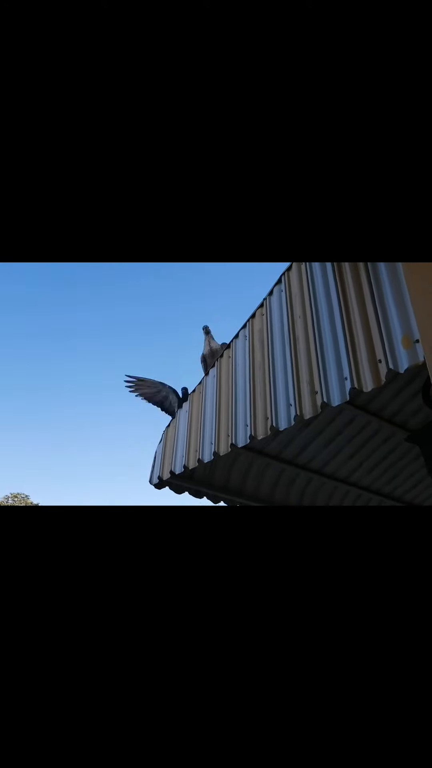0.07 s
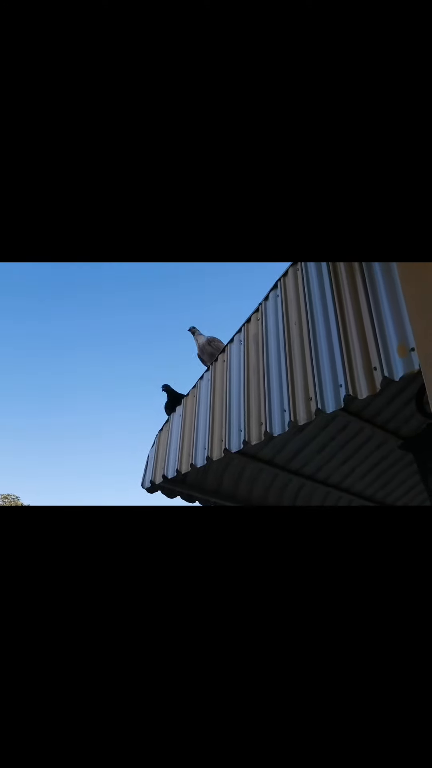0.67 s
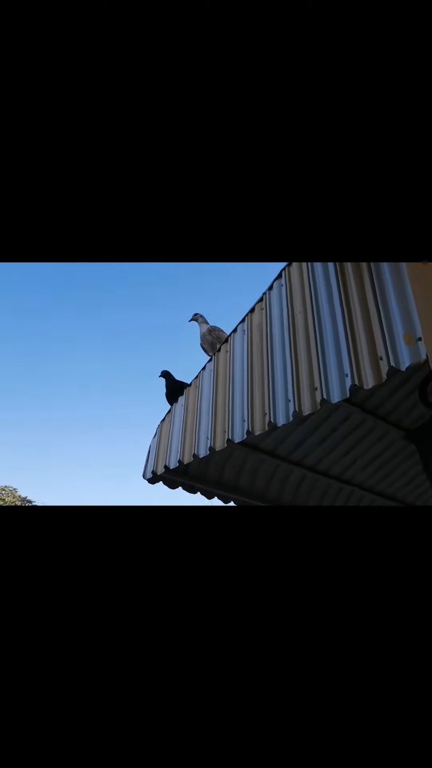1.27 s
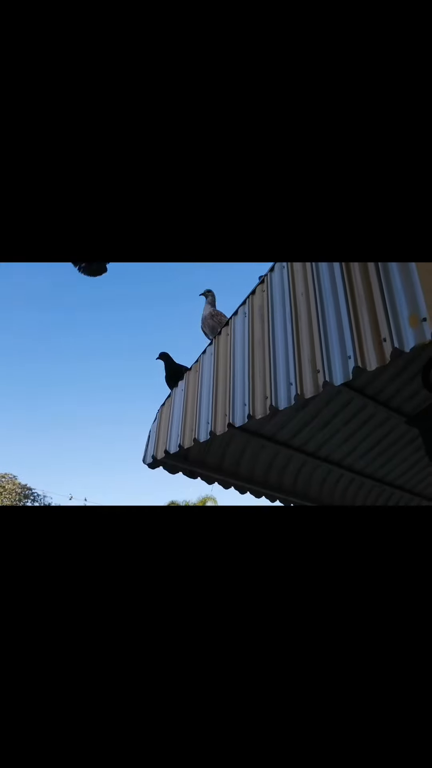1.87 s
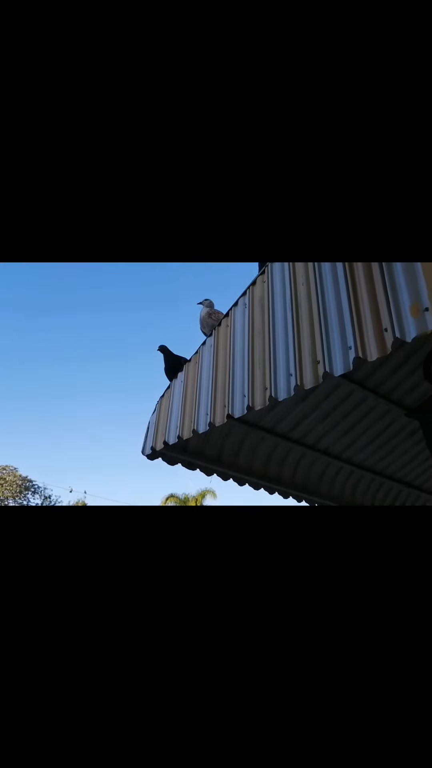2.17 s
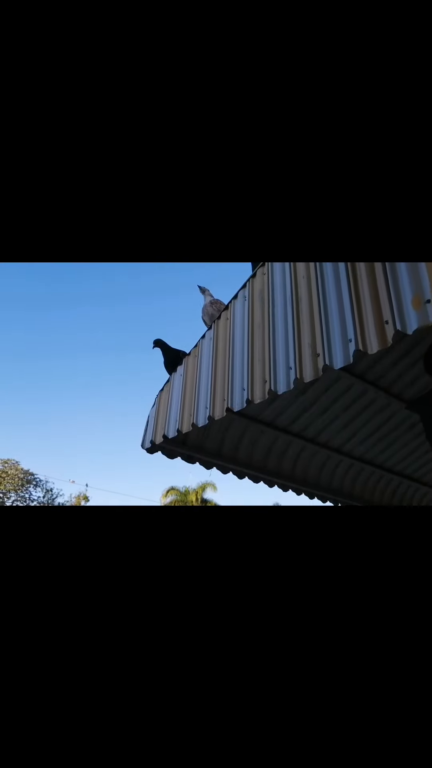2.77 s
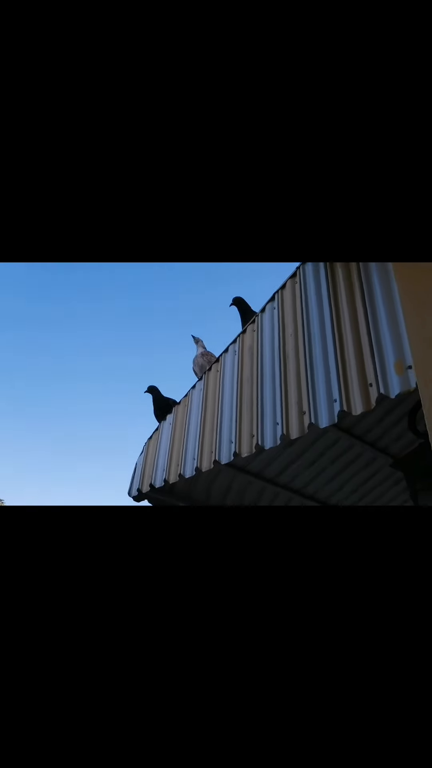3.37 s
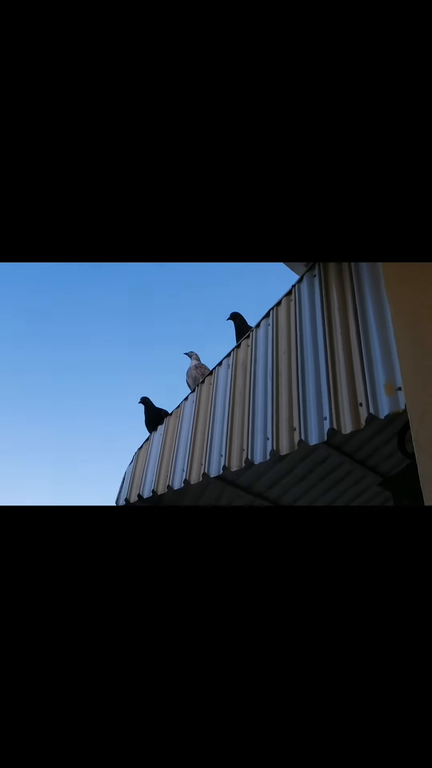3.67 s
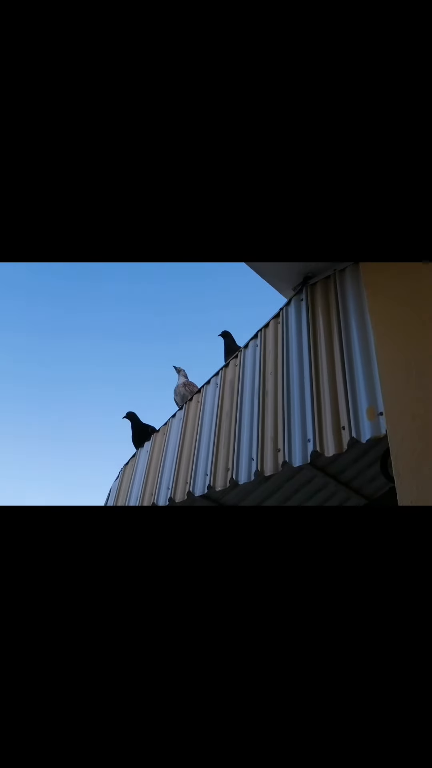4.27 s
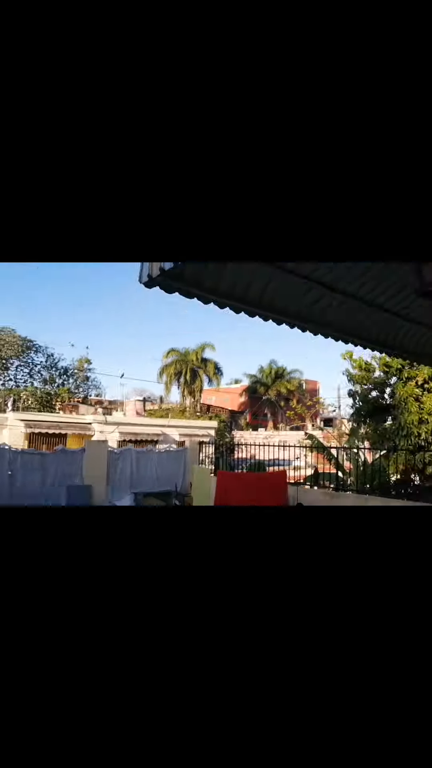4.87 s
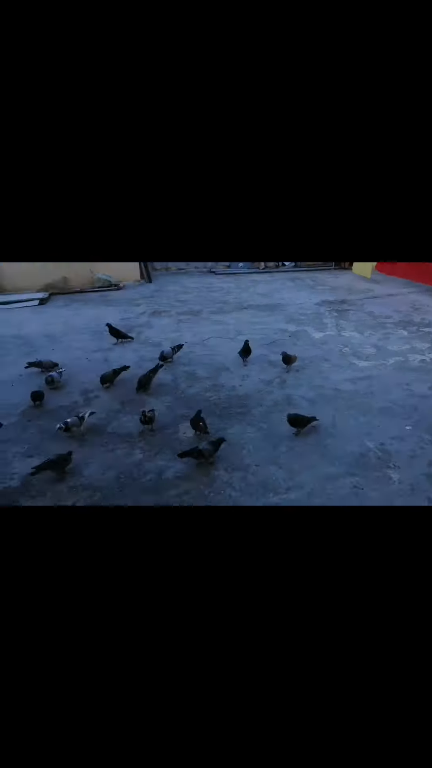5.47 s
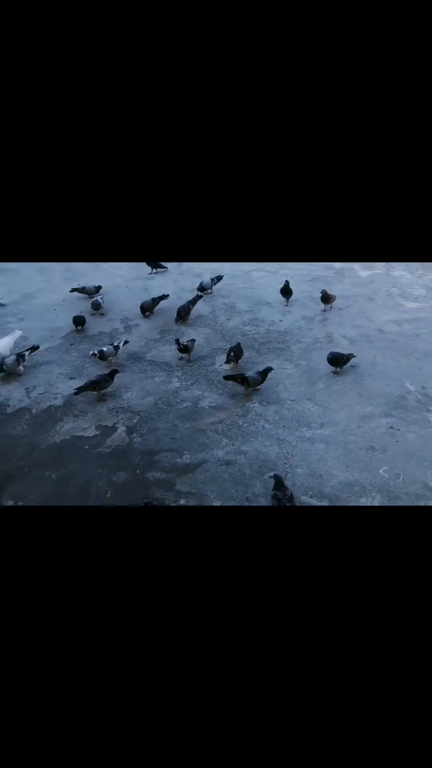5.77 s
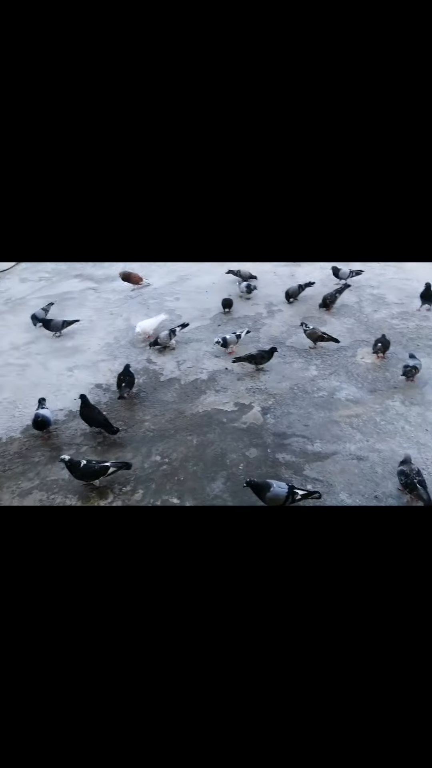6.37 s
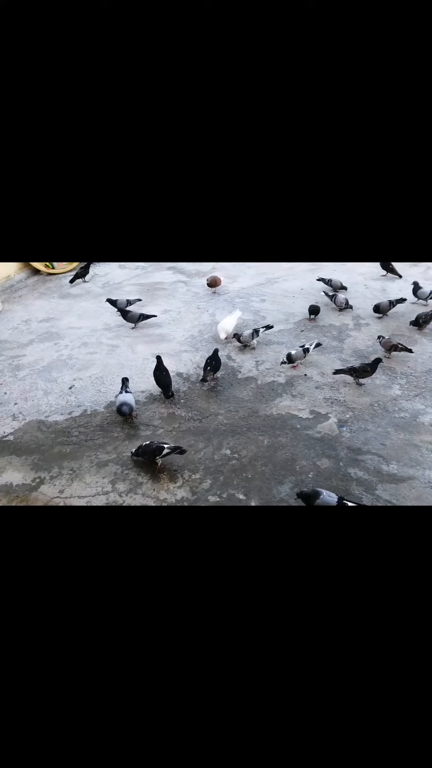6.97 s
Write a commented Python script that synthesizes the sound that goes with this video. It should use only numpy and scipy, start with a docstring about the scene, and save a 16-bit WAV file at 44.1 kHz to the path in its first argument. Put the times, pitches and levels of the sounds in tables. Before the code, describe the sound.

Pigeons land on a tin awning with wing claps and claw scuffs, then coo while a small bird sings faintly further off.

```python
"""Pigeons coo on a tin awning above a walled patio, after landing with wing claps, rustles and claw scuffs.
Each coo is a nearly pure throat tone, hoarse when soft or low, among short throaty pulses; walls echo it.
Wings and claws are bursts of crackling noise that ring the tin, with soft rustles and breathy puffs between.
Further off, a small bird repeats a three-note song, with a harsh chirp and faint calls.
Three dry ticks sound close by. Underneath, a quiet outdoor hum, and air buffeting the microphone."""
import sys
import numpy as np
from scipy import signal
from scipy.fft import rfft, irfft, next_fast_len
from scipy.io import wavfile
from scipy.ndimage import uniform_filter1d

SR = 44100
rng = np.random.default_rng(int(sys.argv[2]) if len(sys.argv) > 2 else 0)


def generate_wav(sig):
    """Save sig (samples, or channels by samples) to the path in sys.argv[1] as 16-bit PCM at SR."""
    pcm = np.round(np.clip(np.atleast_2d(sig).T, -1, 1) * 32767).astype(np.int16)
    wavfile.write(sys.argv[1], SR, pcm)


N = 310023
TIME = np.arange(N) / SR

# Distant hum. Each row: frequency in Hz, relative level in dB.
HUM_SPECTRUM = [(71, -35), (120, -5.5), (169, -2.5), (211, -4), (259, 1), (380, -1.5), (739, -13),
                (1300, -16.5), (2290, -15.5), (2800, -23.5), (9050, -33.5), (10600, -46.5), (13800, -46),
                (15000, -64)]
# Air on the microphone. Each row: frequency in Hz, relative level in dB.
BUFFET_SPECTRUM = [(12, -38), (20, -0.5), (65, 3), (86, 3), (108, -5.5), (135, -3), (220, -8), (290, -39),
                   (480, -120)]
# Breeze with one lull. Each row: time in seconds, level in dB.
BREEZE_LEVEL = [(0, -55), (1.2, -53), (1.75, -59), (2.2, -52), (3, -55.5), (7, -56.5)]
# Gusts on the microphone. Each row: centre in seconds, half width in seconds, level in dB.
WIND_GUSTS = [(.58, 0.043, -42), (.87, 0.27, -46.5), (1.56, 0.04, -56.5), (2.12, 0.059, -46.5)]
# Ticks. Each row: time in seconds, peak in dB, centre frequency in Hz, left minus right in dB.
DRY_TICKS = [(1.796, -28, 4770, -22), (2.022, -36.5, 1090, -11), (5.004, -32, 970, -33)]
# Small bird's song. Each row: delay and length in seconds, start and end pitch in Hz,
# relative level in dB, rasp from 0 to 1.
SONG_NOTES = [(0, 0.063, 5534, 5460, -1.5, 0.13), (0.08, .066, 5184, 5050, -4, 0.46),
              (.16, .045, 5220, 5040, -8.5, .45)]
# Repeats of the song. Each row: start in seconds, level in dB, left minus right in dB.
SONG_REPEATS = [(1.08, -42.5, -6), (2.086, -44.5, -18), (3.57, -51.5, 9), (5.615, -56.5, 21)]
# Faint falling calls. Each row: start and length in seconds, start pitch in Hz, level in dB.
FALLING_CALLS = [(5.7, .11, 4700, -64), (5.94, 0.067, 4340, -68), (6.07, 0.068, 5440, -65),
                 (6.098, 0.19, 4120, -72), (6.79, 0.11, 5100, -68.5), (6.92, 0.052, 4400, -62.5)]
# Partials of a harsh two-part chirp. Each row: start and length in seconds, start and end
# frequency in Hz, level in dB, rasp from 0 to 1.
CHIRP_PARTIALS = [(4.437, 0.053, 2720, 2640, -46.5, .2), (4.438, 0.077, 7560, 6920, -56.5, 0.55),
                  (4.538, 0.062, 3200, 2510, -55.5, .39), (4.543, .07, 3600, 3490, -57, 0.44),
                  (4.535, 0.069, 6740, 6500, -56, 0.44), (4.539, 0.055, 7950, 7660, -54, .3),
                  (4.543, 0.048, 10500, 10400, -67, 1), (4.54, 0.051, 13200, 13200, -76, .6)]
# Side of the movement on the awning. Each row: time in seconds, left minus right in dB.
AWNING_PAN = [(0, -.5), (1.8, -0.5), (2.25, 0.5), (2.65, 7), (3.5, 8), (5.4, 16.5), (7, 12)]
# Resonances of the tin. Each row: frequency in Hz, weight in dB (halved in use).
AWNING_MODES = [(759.0, -46.5), (861.3, -60.5), (1109, -68), (1572, -59), (1755, -79), (2078, -55),
                (2589, -58.5), (3122, -64), (3332, -68.5), (3967, -59)]
# Feathers sliding on tin. Each row: start and length in seconds, level in dB.
FEATHER_SLIDES = [(1.477, .04, -61), (1.591, .03, -56), (3.044, 0.12, -57), (3.202, 0.14, -63),
                  (4.206, .08, -69)]
# Hiss of a slide. Each row: frequency in Hz, relative level in dB.
SLIDE_SPECTRUM = [(3000, -20), (5500, -12.5), (8000, -1.5), (9800, -2), (11000, -15.5), (15000, -19)]
# Soft rustles and breathy puffs. Each row: start and length in seconds, relative level in dB,
# air push weight in dB.
RUSTLES_AND_PUFFS = [(0, .15, -40.3, -2.5), (0.43, 0.16, -46, -8), (0.616, .35, -43, -2.5),
                     (1.04, 0.53, -54.5, 0), (1.77, .22, -59, 1.5), (2.076, .21, -52.5, -3),
                     (2.4, 0.94, -65, 8), (3.546, 0.065, -68.5, 13.5), (3.788, 0.056, -65.5, 12),
                     (4.01, 0.22, -71.5, 8), (4.219, .1, -68, 7), (4.546, .09, -63.5, 5),
                     (4.88, 0.34, -69.5, 4.5), (6.773, 0.21, -74, 9)]
# Claws on tin. Each row: start in seconds, level in dB, t60 in seconds, ring in Hz.
CLAW_SCUFFS = [(.325, -43, 0.077, 3320), (0.472, -44, 0.38, 7800), (1.244, -47.5, .21, 5060),
               (1.619, -55.5, .15, 7500), (3.004, -49, 0.12, 2450), (3.25, -50, 0.053, 2990),
               (3.373, -54.5, 0.14, 2970), (3.502, -54, 0.27, 7200), (3.636, -55, 0.2, 7000),
               (4.21, -62, 0.16, 6560), (5.415, -66, 0.12, 8860), (6.051, -67, .15, 7000)]
# Wing claps. Each row: start in seconds, level in dB, air push weight in dB, t60 in seconds, ring in Hz.
WING_STROKES = [(.058, -36, -5, 0.45, 1100), (.09, -42.5, 6.5, 0.29, 960), (.119, -35.5, -7, 0.17, 3070),
                (0.214, -31.8, -4.5, .24, 1490), (.36, -33.5, -8.5, 0.24, 3540),
                (.409, -40, 1.5, 0.25, 5660), (0.6, -39, -4.5, .16, 1380), (0.704, -42.5, 14.5, .08, 870),
                (.78, -40.5, 11, 0.22, 755), (0.889, -34.5, -3, 0.27, 3700), (.945, -38.5, 1, 0.11, 1880),
                (1.026, -47.5, 10, 0.28, 2670), (1.31, -47.5, 2, 0.15, 795), (1.731, -52.5, -4, 0.53, 2650),
                (2.051, -43, 2, 0.58, 5460), (2.225, -37.5, -22, 0.26, 1850), (2.626, -42.5, 2, .9, 1420),
                (2.645, -44.5, 4, .45, 3000)]
# Bright crackle. Each row: frequency in Hz, relative level in dB.
CRACKLE_SPECTRUM = [(700, -9), (1400, -2), (3200, -2.5), (4400, -4), (6000, -4), (7800, -5), (9900, -11),
                    (11000, -21), (15000, -32)]
# Dull push of air. Each row: frequency in Hz, relative level in dB.
PUSH_SPECTRUM = [(150, -3.5), (300, 4.5), (700, 0), (1100, -7), (1700, -16), (3000, -16.5)]
# Throat pulses. Each row: start in seconds, relative peak in dB, pitch in Hz.
THROAT_PULSES = [(0.708, -29, 387), (.786, -32.5, 297), (1.012, -29.5, 363), (1.035, -32.5, 377),
                 (1.092, -30.5, 322), (1.215, -31.5, 334), (1.418, -25.5, 362), (1.762, -29, 320),
                 (2.134, -33.5, 383), (2.203, -28, 390), (2.562, -26.5, 380), (3.81, -31, 360),
                 (3.888, -24, 390), (3.96, -28.5, 359), (4.578, -34, 310), (4.626, -31, 312),
                 (4.878, -24.5, 307), (6.12, -38, 380), (6.241, -39.5, 302), (6.846, -40, 232),
                 (6.89, -39.5, 238)]
# Low murmurs. Each row: start and length in seconds, start and end pitch in Hz, relative level in dB.
LOW_MURMURS = [(1.879, 0.065, 196.5, 187.7, -48.5), (2.012, 0.058, 232, 239.5, -48),
               (2.63, .1, 195, 235, -46), (3.19, .24, 385, 370, -55), (3.511, .17, 230.2, 232.4, -51),
               (3.691, 0.082, 246, 269.5, -47), (4.04, .07, 450, 410, -53), (5.981, 0.1, 256, 287, -57.5),
               (6.442, 0.206, 251.5, 268, -48.5), (6.666, 0.089, 240.2, 211.6, -51),
               (6.835, 0.083, 214.4, 216.2, -53)]
# Full coos, one list per coo. Each row: time in seconds, pitch in Hz, relative level in dB.
COO_CONTOURS = [
    [(1.26, 303, -47), (1.31, 362.8, -42), (1.35, 311.6, -42), (1.457, 403.7, -33), (1.5, 330.6, -30.5),
     (1.6, 309.4, -33.5), (1.7, 328.1, -34.5), (1.77, 310, -39), (1.87, 265.3, -53)],
    [(2.13, 377.4, -42), (2.185, 378, -47.5), (2.205, 382.4, -36.5), (2.29, 380.5, -39.5), (2.34, 377, -58)],
    [(2.42, 476, -56), (2.463, 461.5, -31.5), (2.49, 372, -34.5), (2.545, 383.7, -29.5), (2.6, 378, -62)],
    [(2.74, 252.5, -49.5), (2.84, 385.8, -34), (2.95, 422, -43.5), (2.99, 391, -35), (3.06, 362.3, -40),
     (3.1, 307.6, -42), (3.17, 240.2, -47.5)],
    [(4.12, 484, -52), (4.16, 464.5, -31.5), (4.203, 449.7, -28), (4.24, 368.6, -34), (4.32, 363.6, -30),
     (4.36, 334, -46)],
    [(4.57, 300, -38.5), (4.645, 314, -46.5), (4.7, 406.4, -40.5), (4.798, 403.7, -41.5), (4.82, 411, -27),
     (4.87, 304.1, -37.5), (4.97, 274.5, -35), (5.07, 279.6, -42), (5.14, 309.5, -34.5), (5.21, 306, -40),
     (5.27, 240, -41), (5.34, 190, -49)],
]
# Response of the swollen throat, beak closed. Each row: frequency in Hz, gain in dB.
THROAT_RESPONSE = [(180, -25), (230, -7), (280, -1), (400, 1.5), (480, -1), (530, -4.5), (580, -18.5),
                   (680, -26), (900, -32.5), (1400, -42)]
# Side of the voices. Each row: time in seconds, left minus right in dB.
VOICE_PAN = [(0, 5), (1.5, 4), (2.5, 0), (2.9, 3), (4.2, 6), (4.9, 9.5), (7, 9)]
# Wall reflections. Each row: delay in seconds, gain in dB.
WALL_ECHOES = [(.016, -20), (.025, -12.5), (.043, -11)]


def undb(db):
    """Decibels to gain."""
    return 10 ** (np.asarray(db) / 20)


def unit(x):
    """Scale to rms 1."""
    return x / np.sqrt(np.mean(x ** 2))


def curves(rows):
    """Each column after the first, interpolated over time."""
    times_s, *columns = np.transpose(rows)
    return [np.interp(TIME, times_s, column) for column in columns]


def pan(side_db):
    """Left and right gains with mean 1."""
    gains = undb(np.array([[.5], [-.5]]) * side_db)
    return gains / gains.mean(axis=0)


def swell(start_s, length_s, attack_s, release_s):
    """Envelope: linear rise, hold, exponential release."""
    t = TIME - start_s
    return np.clip(t / attack_s, 0, 1) * np.exp(-np.clip((t - length_s) / release_s, 0, 20))


def walk(rate_hz):
    """Smooth random drift up to about rate_hz, rms 1."""
    size = next_fast_len(N)
    hz = np.fft.rfftfreq(size, 1 / SR)
    return unit(irfft(rfft(rng.standard_normal(size)) / (1 + (hz / rate_hz) ** 4), size)[:N])


def noise(correlation):
    """Stereo white noise with correlated channels."""
    mid, side = rng.standard_normal((2, N))
    side = side * np.array([[1], [-1]])
    return np.sqrt((1 + correlation) / 2) * mid + np.sqrt((1 - correlation) / 2) * side


def colour(x, spectrum):
    """Filter by (Hz, dB) points with steep skirts, to rms 1."""
    size = next_fast_len(N)
    bin_hz = np.fft.rfftfreq(size, 1 / SR) + 1
    hz, db = np.transpose(spectrum)
    gain = undb(np.interp(np.log(bin_hz), np.log(hz), db))
    skirts = np.minimum(bin_hz / hz[0], 1) ** 2 * np.minimum(hz[-1] / bin_hz, 1) ** 4
    return unit(irfft(rfft(x, size) * gain * skirts, size)[..., :N])


def patio_reverb(x, t60_s, wet_db, correlation, onset_s=.011):
    """Add the diffuse ring of the patio."""
    t = TIME[:SR]
    tail = noise(correlation)[:, :SR] * np.exp(-np.log(1000) * t / t60_s)
    tail *= np.minimum(t / onset_s, 1) ** 2
    tail /= np.sqrt(np.sum(tail ** 2, axis=1, keepdims=True))
    return x + undb(wet_db) * signal.fftconvolve(x, tail, axes=1)[:, :N]


def outdoor_hum(level_db=-56, swing_db=.3, side_db=7.5):
    """Distant, slowly swelling hum from the open side."""
    return colour(noise(.22), HUM_SPECTRUM) * undb(level_db + swing_db * walk(2.4)) * pan(side_db)


def wind_buffet(swing_db=2.2):
    """A restless breeze and a few gusts rumble on the microphone."""
    breeze = undb(curves(BREEZE_LEVEL)[0] + swing_db * walk(rate_hz=7))
    gusts = sum(undb(db) * np.exp(-np.minimum(((TIME - centre_s) / width_s) ** 2, 20))
                for centre_s, width_s, db in WIND_GUSTS)
    return colour(noise(.83), BUFFET_SPECTRUM) * np.hypot(breeze, gusts)


def ticks():
    """Dry one-cycle ticks close to the microphone."""
    out = np.zeros((2, N))
    for time_s, db, hz, side_db in DRY_TICKS:
        phase = 2 * np.pi * hz * (TIME - time_s)
        cycle = phase * np.exp(np.maximum(1 - phase ** 2, -100) / 2)
        out -= undb(db) * pan(side_db) * cycle
    return out


def bird_notes(call_fall=.074, call_rasp=.65, call_side_db=19, chirp_side_db=17.5):
    """Yield every song note, falling call and chirp partial."""
    for start_s, song_db, side_db in SONG_REPEATS:
        for delay_s, length_s, start_hz, end_hz, db, rasp in SONG_NOTES:
            yield start_s + delay_s, length_s, start_hz, end_hz, song_db + db, rasp, side_db
    for start_s, length_s, hz, db in FALLING_CALLS:
        yield start_s, length_s, hz, hz * (1 - call_fall), db, call_rasp, call_side_db
    for partial in CHIRP_PARTIALS:
        yield (*partial, chirp_side_db)


def small_birds(full_rasp_hz=480, taper=.8):
    """Gliding whistles, roughened by fast pitch tremor and smeared by distance."""
    out, tremor = np.zeros((2, N)), walk(630)
    for start_s, length_s, start_hz, end_hz, db, rasp, side_db in bird_notes():
        first, count = int(start_s * SR), int(length_s * SR)
        progress = np.linspace(0, 1, count)
        tremor_hz = full_rasp_hz * rasp * np.roll(tremor, rng.integers(N))[:count]
        hz = start_hz + (end_hz - start_hz) * progress + tremor_hz
        envelope = np.abs(np.sin(np.pi * progress ** .7)) ** taper
        note = envelope * np.sin(2 * np.pi * np.cumsum(hz) / SR)
        out[:, first:first + count] += undb(db) * pan(side_db) * note[:N - first]
    return patio_reverb(out, t60_s=.43, wet_db=.5, correlation=.1)


def awning(x, ring_db=-1, width_hz=32):
    """The tin sheet rings along with whatever brushes it."""
    top_db = max(db for hz, db in AWNING_MODES)
    out = x.copy()
    for hz, db in AWNING_MODES:
        mode = signal.lfilter(*signal.iirpeak(hz, hz / width_hz, fs=SR), x)
        out += undb(ring_db + (db - top_db) / 2) * mode
    return out


def feather_slides(grain_db=3):
    """Thin, uneven hiss as the birds shift on the sheet."""
    envelope = sum(undb(db) * swell(start_s, length_s, attack_s=.017, release_s=.03)
                   for start_s, length_s, db in FEATHER_SLIDES)
    return envelope * colour(noise(.1) * undb(grain_db * walk(250)), SLIDE_SPECTRUM)


def feather_flex(x, depth_db=3.5, frame_samples=1024):
    """Feathers flex and shift, so narrow patches of their spectrum come and go."""
    _, _, frames = signal.stft(x, nperseg=frame_samples)
    patches = uniform_filter1d(rng.standard_normal(frames.shape[1:]), size=7, axis=0)
    patches = uniform_filter1d(patches, size=4, axis=1)
    _, mottled = signal.istft(frames * undb(depth_db * unit(patches)), nperseg=frame_samples)
    return unit(mottled[:, :N])


def rustle_and_puff_power(crackle_trim_db=1, push_trim_db=2.5, flutter_db=1.87):
    """Power envelopes of crackle and pushed air for the soft rustles and breathy puffs."""
    flutter = undb(flutter_db * walk(25))
    crackle_power, push_power = np.zeros((2, N))
    for start_s, length_s, db, push_db in RUSTLES_AND_PUFFS:
        bout = undb(db) * flutter * swell(start_s, length_s, attack_s=.0099, release_s=.1)
        crackle_power += (bout * undb(crackle_trim_db)) ** 2
        push_power += (bout * undb(push_db + push_trim_db)) ** 2
    return crackle_power, push_power


def blows(stroke_ring_db=-4, scuff_ring_db=-1, scuff_push_db=-10):
    """Yield every wing stroke and claw scuff."""
    for start_s, db, push_db, t60_s, ring_hz in WING_STROKES:
        yield start_s, db, push_db, stroke_ring_db, t60_s, ring_hz
    for start_s, db, t60_s, ring_hz in CLAW_SCUFFS:
        yield start_s, db, scuff_push_db, scuff_ring_db, t60_s, ring_hz


def wings_and_claws(ring_q=6.6, grain_db=1.5, push_trim_db=-2.5, rise_per_t60=.0105, snap=.77, snap_s=.007):
    """Each blow crackles with a papery ring over a duller push of air; rustles and puffs lie between."""
    crackle_power, push_power = rustle_and_puff_power()
    grain = undb(grain_db * walk(620))
    scrape, rings = noise(.3) * grain, np.zeros((2, N))
    for start_s, db, push_db, ring_db, t60_s, ring_hz in blows():
        first = int(start_s * SR)
        span = slice(first, min(first + SR, N))
        t = TIME[:span.stop - first]
        rise = np.minimum(t / (rise_per_t60 * t60_s), 1)
        envelope = undb(db) * rise * np.exp(-np.log(1000) * t / t60_s)
        # Vanes snap at first contact, then only brush.
        crackle_power[span] += (envelope * (1 + snap * np.exp(-t / snap_s))) ** 2
        push_power[span] += (envelope * undb(push_db + push_trim_db)) ** 2
        ring = signal.lfilter(*signal.iirpeak(ring_hz, ring_q, fs=SR), scrape[:, span])
        rings[:, span] += envelope * undb(ring_db) * unit(ring)
    crackle = colour(feather_flex(noise(.039)) * grain, CRACKLE_SPECTRUM)
    air = colour(feather_flex(noise(.92)) * grain, PUSH_SPECTRUM)
    return rings + np.sqrt(crackle_power) * crackle + np.sqrt(push_power) * air


def throat_pulses(cycles=6.17, sag=.17):
    """Puffs of a few cycles through the swollen throat, sagging in pitch."""
    out = np.zeros(N)
    for start_s, db, hz in THROAT_PULSES:
        length_s = cycles / hz
        on = (TIME >= start_s) & (TIME < start_s + length_s)
        progress = (TIME[on] - start_s) / length_s
        envelope = np.sin(np.pi * progress ** .55) ** 2
        phase = 2 * np.pi * np.cumsum(hz * (1 + sag * (.5 - progress))) / SR
        out[on] += undb(db) * envelope * np.sin(phase)
    return out


def coo_curves(fade_s=.012):
    """Yield pitch in Hz and gain over time for every coo and murmur."""
    for rows in COO_CONTOURS:
        hz, db = curves(rows)
        inside_s = np.minimum(TIME - rows[0][0], rows[-1][0] - TIME)
        yield hz, undb(db) * np.clip(inside_s / fade_s + .5, 0, 1)
    for start_s, length_s, start_hz, end_hz, db in LOW_MURMURS:
        hz = np.interp(TIME, [start_s, start_s + length_s], [start_hz, end_hz])
        yield hz, undb(db) * swell(start_s, length_s, attack_s=.025, release_s=.015)


def hoarseness(hz, gain, clear_db=-33.5, clear_hz=321, per_db=.07, per_hz=.008, least=.12, most=.52):
    """A loud, high coo is clear; it roughens as it softens or drops."""
    below_db = np.maximum(clear_db - 20 * np.log10(gain), 0)
    below_hz = np.maximum(clear_hz - hz, 0)
    return np.minimum(least + per_db * below_db + per_hz * below_hz, most)


def coos(db_per_harmonic=-5, waver=.0713):
    """Three harmonics through the throat: a near sine when high, hollow and reedy when low."""
    level_jitter, pitch_jitter = walk(104), walk(62)
    throat_hz, throat_db = np.transpose(THROAT_RESPONSE)
    harmonics, out = np.arange(1, 4)[:, None], np.zeros(N)
    for hz, gain in coo_curves():
        on = gain > 1e-5
        hz, gain = hz[on], gain[on]
        rough = hoarseness(hz, gain)
        shaken_hz = hz * (1 + waver * np.sqrt(rough) * pitch_jitter[on])
        phase = 2 * np.pi * np.cumsum(shaken_hz) / SR
        weights = undb(np.interp(harmonics * hz, throat_hz, throat_db) + db_per_harmonic * (harmonics - 1))
        tone = np.sum(weights * np.sin(harmonics * phase), axis=0) / np.linalg.norm(weights, axis=0)
        out[on] += gain * tone * (1 + rough * level_jitter[on]) / np.sqrt(1 + rough ** 2)
    return np.sqrt(2) * out


def pigeon_voices(coo_trim_db=-.62, pulse_trim_db=1, lag_s_per_db=.00003):
    """Coos and pulses with their wall echoes, reaching the nearer ear first."""
    voice = undb(coo_trim_db) * coos() + undb(pulse_trim_db) * throat_pulses()
    left = voice + sum(undb(db) * np.interp(TIME - delay_s, TIME, voice) for delay_s, db in WALL_ECHOES)
    side_db, = curves(VOICE_PAN)
    right = np.interp(TIME - lag_s_per_db * side_db, TIME, left)
    return patio_reverb(np.array([left, right]), t60_s=.52, wet_db=-8, correlation=.75) * pan(side_db)


def scene():
    """Everything on the patio, in stereo."""
    movement = (awning(wings_and_claws()) + feather_slides()) * pan(curves(AWNING_PAN)[0])
    movement = patio_reverb(movement, t60_s=.41, wet_db=-9.5, correlation=.15)
    return pigeon_voices() + movement + small_birds() + ticks() + outdoor_hum() + wind_buffet()


def record(dry):
    """Steep low-pass at 15 kHz."""
    return signal.sosfilt(signal.ellip(8, .2, 70, 15000, fs=SR, output="sos"), dry)


dry = scene()
out = record(dry)
generate_wav(out)
```